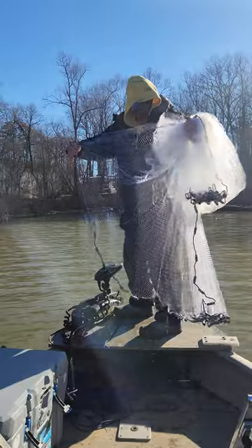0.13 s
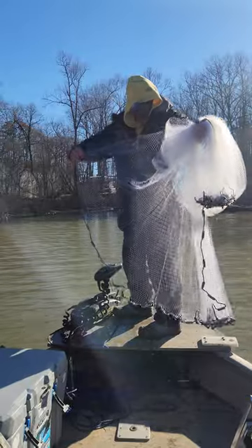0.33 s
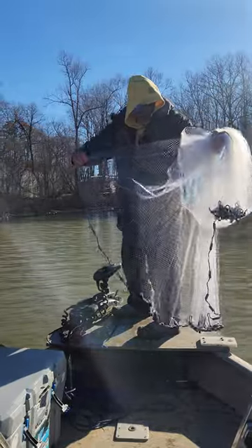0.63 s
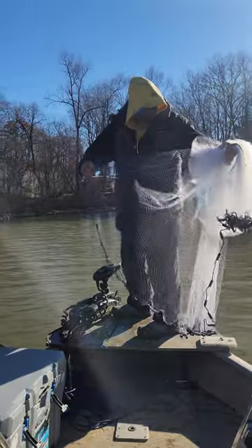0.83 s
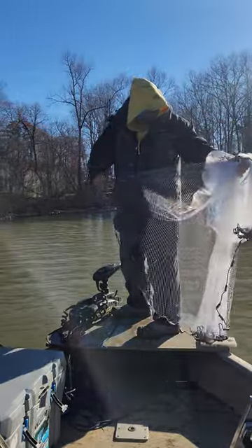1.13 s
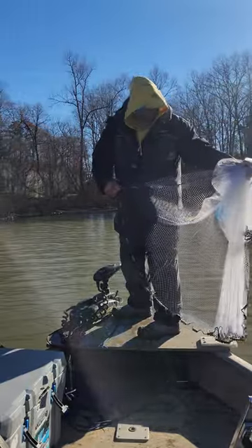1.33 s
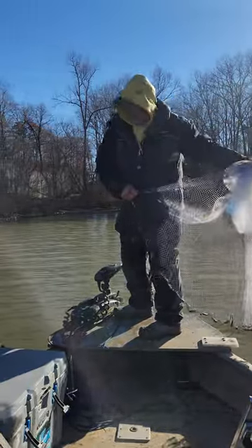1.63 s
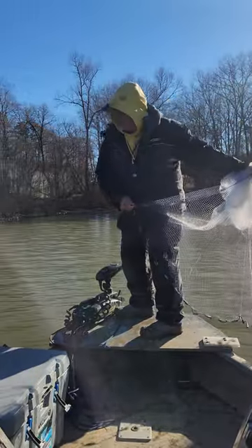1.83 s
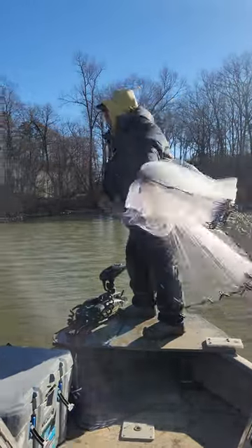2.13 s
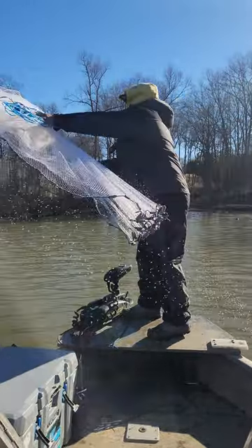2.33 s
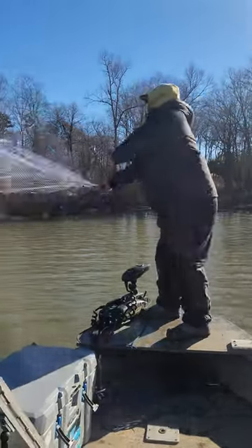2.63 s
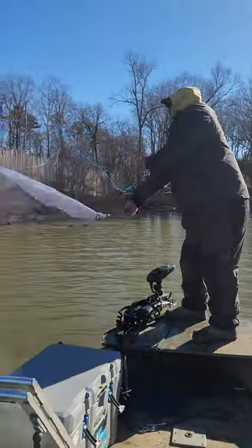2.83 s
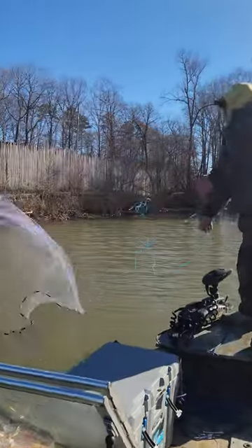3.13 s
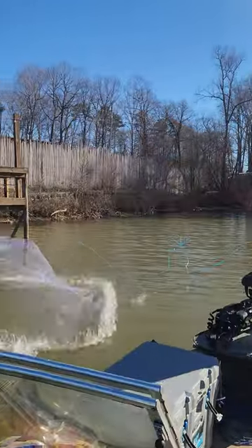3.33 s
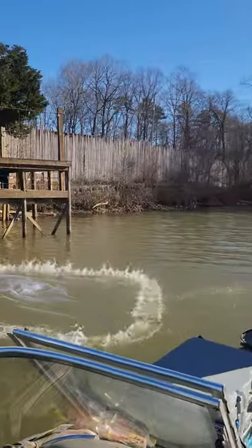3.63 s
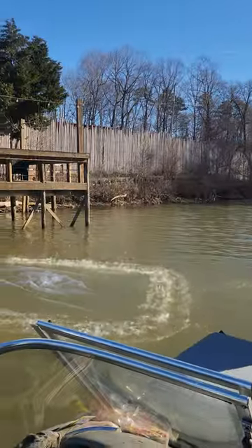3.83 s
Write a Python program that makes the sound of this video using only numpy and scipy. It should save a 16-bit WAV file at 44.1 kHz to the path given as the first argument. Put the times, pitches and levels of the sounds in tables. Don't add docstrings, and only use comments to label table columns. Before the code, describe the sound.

A wet weighted net is gathered with sparse ticks and soft deck knocks, swung with a hissing swish, then splashes a few metres away; low wind and faint hull hum, close microphone aboard.

```python
import sys
import numpy as np
from scipy import signal
from scipy.fft import rfft, irfft, next_fast_len
from scipy.io import wavfile
from scipy.ndimage import uniform_filter1d, map_coordinates

SR = 44100
rng = np.random.default_rng(int(sys.argv[2]) if len(sys.argv) > 2 else 0)


def natural_amplitude(level_db):
    exponent = np.asarray(level_db, float) / 20
    return 10 ** exponent


def wav_record(signal):
    frames = np.transpose(np.atleast_2d(signal))
    bounded = np.clip(frames, -1, 1)
    quanta = np.round(bounded * 32767).astype(np.int16)
    wavfile.write(sys.argv[1], SR, quanta)


N = 176400
TOP_HZ = 15850


def unit(x):
    return x / np.sqrt(np.mean(x ** 2) + 1e-20)


def along(points, hz):
    f, v = np.transpose(points)
    return np.interp(np.log(hz + 1), np.log(f + 1), v)


def curve(rows):
    return np.interp(np.arange(N) / SR, *np.transpose(rows))


def wobble(rate):
    knots = rng.standard_normal(int(N * rate / SR) + 4)
    return map_coordinates(knots, [np.arange(N) * rate / SR])


def filtered(x, response):
    m = next_fast_len(N + 8192)
    return irfft(rfft(x, m) * response(np.fft.rfftfreq(m, 1 / SR)), m)[..., :N]


def spread(pair, gain, alike):
    def mid_side(hz):
        turn = np.arccos(np.clip(along(alike, hz), -1, 1)) / 2
        return gain(hz) * [np.cos(turn), np.sin(turn)]

    mid, side = filtered(pair, mid_side)
    return unit(np.array([mid + side, mid - side]))


def noise(patchy_db):
    z = signal.stft(rng.standard_normal((2, N)), nperseg=512)[2]
    field = uniform_filter1d(uniform_filter1d(rng.standard_normal(z.shape[1:]), 6, 0), 8, 1)
    return signal.istft(z * natural_amplitude(patchy_db * unit(field)), nperseg=512)[1][:, :N]


def grains(count, t0, t1, mid_hz, spread_oct, cycles, spiky_db, size):
    r, t = rng.random((count, 4)), np.arange(size) / SR
    hz = np.clip(mid_hz * 2 ** (spread_oct * (2 * r[:, 1:2] - 1)), 200, 16000)
    level = natural_amplitude(-spiky_db * np.log(r[:, 2:3] + 1e-4))
    rise = 1 + 0.112 * t * hz / cycles
    body = level * np.exp(-t * hz / cycles) * np.sin(2 * np.pi * hz * t * rise)
    start = ((t0 + (t1 - t0) * r[:, :1]) * SR).astype(int)
    at = start + np.arange(size) + (r[:, 3:] > .5) * (N + size)
    out = np.bincount(at.ravel(), body.ravel(), 2 * (N + size)).reshape(2, -1)[:, :N]
    return unit(out) * np.sqrt((t1 - t0) * SR / N)


# time_s, level_db
AMBIENCE = [(.24, -50), (.8, -47.5), (1.6, -50), (2.7, -48.5), (4, -54.5)]
# pitch_hz, level_db (per Hz)
WIND_COLOUR = [(18, -4), (38, 4), (70, 4), (130, 0), (200, -26), (300, -120)]
# pitch_hz, level_db (per Hz)
FAR_COLOUR = [(60, -33), (110, 0.5), (190, -1.5), (330, -7), (430, -15.5), (712, -20), (1900, -48.5),
              (5000, -79.5)]
# pitch_hz, drift_hz, level_db
HULL_HUMS = [
    (181.34, 1.564, -48),
    (223.5, 2.18, -54),
    (261.3, 2.206, -53),
    (313.9, 6, -59.5),
]
BUFFET_S, BUFFET_DB, BUFFET_BEFORE_DB = .51, -43.5, -13
GUST_DB = 1.5


def lake():
    air, t = curve(AMBIENCE), np.arange(N) / SR
    wind = spread(noise(patchy_db=0.5), lambda f: natural_amplitude(along(WIND_COLOUR, f)), [(50, .99)])
    not_yet = np.clip((BUFFET_S - t) / 0.018, 0, 1)
    wind_db = BUFFET_DB + BUFFET_BEFORE_DB * not_yet + GUST_DB * wobble(5.06)
    far_alike = [(200, 0.98), (800, 0.7), (3000, 0.17)]
    far = spread(noise(patchy_db=1.0), lambda f: natural_amplitude(along(FAR_COLOUR, f)), far_alike)
    far_db = air + 1 + 1.26 * wobble(12)
    hum = np.zeros(N)
    for hz, drift_hz, db in HULL_HUMS:
        level = natural_amplitude(db + 2.0 * wobble(7.7))
        hum += level * np.sin(2 * np.pi * np.cumsum(hz + drift_hz * wobble(9)) / SR)
    return natural_amplitude(wind_db) * wind + natural_amplitude(far_db) * far + natural_amplitude(1.53 * (air - air.mean())) * hum


# time_s, level_db
SWING_EFFORT = [(.3, -77), (.74, -78), (.82, -73), (1.5, -69.5), (2.2, -58.5), (2.3, -48), (2.39, -44),
                (2.415, -53), (2.5, -42.5), (2.54, -46), (2.56, -46.5), (2.64, -52), (2.72, -47.5),
                (2.9, -50), (3.02, -56.5), (3.4, -54.5)]
# pitch_hz, level_db (per Hz)
SWISH_COLOUR = [(250, -35), (400, -1), (910, -7), (3500, -14.5), (6000, -33)]
# pitch_hz, level_db
MIC_COLOUR = [(1500, -23), (3000, -10.5), (4930, 0.5), (6500, -11), (7500, -2.5), (10000, -8), (12200, 0.5),
              (15500, -7)]
# pitch_hz, level_db
STILL_COLOUR = [(1500, -24), (3000, -10), (4930, -1), (6500, -18), (8000, -5), (10000, -10), (12200, -1),
                (15500, -3)]
DROP_SPIKY_DB = 2.5


def net():
    effort = curve(SWING_EFFORT)
    drops = grains(count=2500, t0=0, t1=4, mid_hz=9000, spread_oct=1.0, cycles=1.5,
                   spiky_db=DROP_SPIKY_DB, size=80)
    wet_mesh = noise(patchy_db=-2.0) + 0.32 * drops
    hiss = spread(wet_mesh, lambda f: natural_amplitude(along(MIC_COLOUR, f)), [(3000, 0.21), (9000, 0.07)])
    swish = spread(noise(patchy_db=2.9), lambda f: natural_amplitude(along(SWISH_COLOUR, f)), [(500, 0.71), (3000, 0.2)])
    still = spread(noise(patchy_db=2.2), lambda f: natural_amplitude(along(STILL_COLOUR, f)), [(3000, .3), (9000, .1)])
    moving = np.clip((effort + 74) / 14, 0, 1)
    mesh = np.sqrt(moving) * hiss + np.sqrt(1 - moving) * still
    swish_db = -56.5 + 0.72 * (effort + 56.5) + wobble(9.03)
    return natural_amplitude(effort + 0.71 * wobble(24.88)) * mesh + natural_amplitude(swish_db) * swish


# start_s, level_db (peak), left_right_db, rustle_db (over tick), pitch_hz
GATHER_TICKS = [(.246, -57.5, -3, -7, 4500), (.296, -43.5, 5.5, -4.5, 8000), (.306, -45, 4, -6.5, 8000),
                (.371, -40.5, 5, -8.5, 9000), (.505, -60.5, 6, -11, 13000), (.527, -49, 4, -10, 5000),
                (.55, -52, 9, -16, 5000), (.7635, -25.5, 5, -18, 6500), (.844, -46, 11, -18, 3000),
                (.989, -51, 9, -9.5, 3200), (1.049, -54, 10, -7, 13000), (1.158, -44, 7, -14, 7550),
                (1.582, -50, 12, -14, 12000), (1.718, -51, 14, -14, 12000), (1.908, -49, 10, -12, 8000)]
THROW_TICKS = [(2.386, -30, 11, -16, 12000), (2.430, -36, 2, -12, 10000), (2.442, -32.5, 8, -5, 11000),
               (2.5125, -23.5, 7.5, -9, 10100), (2.5858, -22, 6.5, -14.5, 10000),
               (2.688, -32, 9.5, -15, 13000), (2.7725, -36.5, 16, -10, 9000),
               (2.8047, -12.5, 5, -23.5, 7100), (2.864, -36, 8, -22, 13000),
               (2.8727, -32.5, 10, -14, 12000), (2.895, -42.5, 19, -6, 11000),
               (2.9725, -36.5, 9, -11.5, 9000), (3.058, -38, 2, -8, 9000), (3.0625, -27, -1, -7, 3800),
               (3.392, -34, 13, -8.5, 8000), (3.4155, -35.5, 11, 0, 4000)]
DRIPS = [(.475, -62, 3, -3, 4800), (.62, -62, 4, -12, 5000), (.665, -66, 5, -6, 12000),
         (.8208, -64, 6.5, -14, 14000), (.853, -54, 8, -8, 7600), (.864, -56, 6, -3, 4200),
         (1.146, -58, 6, -6, 7500), (1.2139, -56, 6, -14, 14000), (1.2583, -57, 6.5, -14, 14000),
         (1.5097, -60, 4.5, -12, 13000), (1.6145, -57, 5.5, -12, 13000), (1.6828, -52, 7, -12, 13000),
         (1.8365, -57, 4, -10, 12000), (2.326, -37, 3, -12, 2000), (2.372, -40, 6, -10, 8000),
         (2.451, -38, 8, -6, 12000), (2.49, -40, 7, -2, 12500), (2.525, -36, 7, -4, 12000),
         (2.6, -38, 6, -8, 6000), (2.672, -44, 8, -8, 14000)]
WATER_SLAPS = [(3.4508, -23, 1.5, -8, 2000), (3.4662, -18, 1.5, -6, 1800), (3.4711, -30, 9, -6, 8000),
               (3.4901, -20, 9, -10, 8000), (3.52, -15, 2, -8, 1500), (3.5474, -22, 5, -12, 10500),
               (3.5779, -22, 8, -10, 6500), (3.6413, -17, 2.5, -6, 1800), (3.695, -30, 6, -14, 6000),
               (3.7047, -10, 3, -8, 2000), (3.7435, -23, 9.5, -14, 8500), (3.807, -22, 1, -8, 1500),
               (3.8843, -21, 1.5, -6, 1500), (3.9, -30, 6, -3, 5200), (3.932, -30, 8, -12, 10000)]
# start_s, level_db, pitch_hz
DECK_KNOCKS = [
    (.524, -33, 130),
    (.762, -25, 172),
    (2.983, -25, 121),
]
# start_s, level_db, pitch_hz
METAL_TAPS = [
    (.845, -45, 1140),
    (.845, -50, 1420),
    (.845, -52, 2000),
    (.845, -54, 2700),
    (.846, -54, 4300),
    (.527, -58, 2300),
    (.645, -56, 1060),
    (.69, -58, 1450),
]
LEAD_S, SNAP_RISE_S, SNAP_S, RUSTLE_S = .004, .0006, .003, .011
TICK_WIDE, SPECK_WIDE = 1.7, 1.3
FAINT_DB = -48


def tick(rustle_db, mid_hz, wide, order):
    late = np.arange(SR // 20) / SR - LEAD_S
    z = rng.standard_normal((4, len(late)))
    snap_t60 = np.where(late < 0, 3 * SNAP_RISE_S, SNAP_S)
    snap = (1.2 * z[0] + 0.4 * z[1:3]) * natural_amplitude(-60 * np.abs(late) / snap_t60)
    rough = np.abs(uniform_filter1d(z[3], 40)) * 6 + 0.38
    swell = np.exp(-(late / np.where(late < 0, LEAD_S / 2, RUSTLE_S)) ** 2)
    rustle = natural_amplitude(rustle_db) * (.6 * z[0, ::-1] + .8 * z[1:3]) * rough * swell
    edges = [mid_hz / wide, min(mid_hz * wide, SR / 2.2)]
    return signal.sosfilt(signal.butter(order, edges, "band", fs=SR, output="sos"), snap + rustle)


def weights():
    ticks, rings, t = np.zeros((2, N + SR)), np.zeros(N + SR), np.arange(SR // 20) / SR
    clear = [(row, row[1] > FAINT_DB) for row in GATHER_TICKS + THROW_TICKS]
    small = [(row, False) for row in DRIPS + WATER_SLAPS]
    for (s, db, pan_db, rustle_db, mid_hz), strong in clear + small:
        wide, order = (TICK_WIDE, 1) if strong else (SPECK_WIDE, 2)
        sides = natural_amplitude(db + np.array([[pan_db], [-pan_db]]) / 2)
        ticks[:, round((s - LEAD_S) * SR):][:, :len(t)] += sides * tick(rustle_db, mid_hz, wide, order)
    for rows, t60, crack in ((DECK_KNOCKS, .035, 0), (METAL_TAPS, .04, .3)):
        for s, db, hz in rows:
            ring = np.sin(2 * np.pi * hz * t) * natural_amplitude(-60 * t / t60) * (1 - np.exp(-t * hz * 2))
            ring += crack * rng.standard_normal(len(t)) * natural_amplitude(-60 * t / 0.11)
            rings[round(s * SR):][:len(t)] += natural_amplitude(db) * ring
    bright = filtered(ticks[:, :N], lambda f: natural_amplitude(0.58 * along(MIC_COLOUR, f) - 27 * (f > TOP_HZ)))
    return bright + filtered(rings[:N], lambda f: 1 / (1 + (f / 3000) ** 4))


# start_s, level_db, first_pitch_hz, last_pitch_hz, length_s
CAVITIES = [(3.464, -33, 600, 400, .015), (3.473, -27.5, 885, 535, .04), (3.495, -28, 321, 269, 0.033),
            (3.512, -28.5, 788, 596, 0.025), (3.539, -24, 613.7, 501, 0.0396),
            (3.572, -25, 400, 258, 0.024), (3.605, -22.5, 461, 337, 0.047),
            (3.639, -25.5, 851, 509, 0.0343), (3.67, -29, 400, 330, 0.02), (3.692, -26, 650, 350, 0.02),
            (3.706, -23, 420, 300, 0.032), (3.88, -39.5, 485, 520, 0.037)]
GULP_OCTAVE_DB, GULP_ROUGH_DB, GULP_ROUGH_RAD = -11, 3, .65


def gulps():
    out = np.zeros(N + SR)
    for s, db, first_hz, last_hz, length_s in CAVITIES:
        u = np.arange(round(length_s * SR)) / (length_s * SR)
        rough = uniform_filter1d(rng.standard_normal((2, SR // 10)), size=120)[:, :len(u)] * 11
        phase = 2 * np.pi * np.cumsum(first_hz * (last_hz / first_hz) ** u) / SR
        phase = phase + GULP_ROUGH_RAD * rough[1]
        tone = np.sin(phase) + natural_amplitude(GULP_OCTAVE_DB) * np.sin(2 * phase)
        out[round(s * SR):][:len(u)] += natural_amplitude(db + GULP_ROUGH_DB * rough[0]) * np.sin(np.pi * u) ** 0.46 * tone
    return filtered(out[:N], lambda f: 1 / (1 + (230 / (f + 1)) ** 6))


# time_s, level_db
LANDING_STRENGTH = [(3.385, -59.5), (3.42, -46), (3.455, -43.5), (3.466, -37), (3.496, -34), (3.536, -34.5),
                    (3.576, -35), (3.602, -38), (3.646, -35), (3.684, -40), (3.71, -37), (3.74, -39),
                    (3.775, -41.5), (3.85, -41.5), (3.91, -38.5), (4, -40)]
# pitch_hz, level_db (per Hz)
CHURN_COLOUR = [(200, -30), (330, -8), (750, -2), (1040, -5), (1790, -2.5), (3300, -9), (4200, -15),
                (15500, -22)]
# pitch_hz, likeness (0 to 1)
SPLASH_ALIKE = [(300, 1), (1000, 0.9), (2500, 0.8), (6000, .5)]
# pitch_hz, left_right_db
SPLASH_LEAN = [(400, 0.5), (2400, 2.5), (15000, 9)]
BUBBLE_DB, BUBBLE_SPIKY_DB = -4, 2.3
SPLASH_LAG = 4


def splash():
    strength = np.where(np.arange(N) > 3.385 * SR, curve(LANDING_STRENGTH), -120)
    churn = spread(noise(patchy_db=-0.5), lambda f: natural_amplitude(along(CHURN_COLOUR, f)), SPLASH_ALIKE)
    bubble_colour = [(200, -15), (400, 12.5), (3300, 14), (4200, 0)]  # Hz, dB
    bubbles = grains(count=2000, t0=3.38, t1=4, mid_hz=1492, spread_oct=1.212, cycles=4.2,
                     spiky_db=BUBBLE_SPIKY_DB, size=500)
    bubbles = spread(bubbles, lambda f: natural_amplitude(along(bubble_colour, f)), SPLASH_ALIKE)
    patter = grains(count=1500, t0=3.38, t1=4, mid_hz=8000, spread_oct=0.77, cycles=2.2,
                    spiky_db=DROP_SPIKY_DB, size=100)
    spray = spread(noise(patchy_db=3.0) + .9 * patter,
                   lambda f: natural_amplitude(.6 * along(MIC_COLOUR, f)) / (1 + f / 9000), SPLASH_ALIKE)
    wet = natural_amplitude(strength - 0.2 + 0.93 * wobble(40)) * churn + natural_amplitude(strength + BUBBLE_DB) * bubbles
    mist_db = np.where(strength > -100, -42.5 + .75 * (strength + 36), -120)
    mist = natural_amplitude(mist_db + 1.2 * wobble(20)) * spray

    def lean(f):
        left = natural_amplitude(along(SPLASH_LEAN, f) / 2) * np.exp(-1j * np.pi * f * SPLASH_LAG / SR)
        return left ** np.array([[1], [-1]])

    return filtered(wet + mist + gulps(), lean)


LEFT_LEADS_S = .00011


def scene():
    def to_left(f):
        return (natural_amplitude(.2) * np.exp(1j * np.pi * f * LEFT_LEADS_S)) ** np.array([[1], [-1]])

    bed = filtered(lake(), to_left) + net() + splash()
    return filtered(bed, lambda f: f < TOP_HZ) + weights()


def roll_off(x):
    return signal.sosfilt(signal.butter(12, 17000, fs=SR, output="sos"), x)


START_S, RISE_S = .2365, 0.0042


def record(dry):
    cut_in = np.clip((np.arange(N) / SR - START_S) / RISE_S, 0, 1)
    return roll_off(dry * cut_in)


dry = scene()
out = record(dry)
wav_record(out)
```